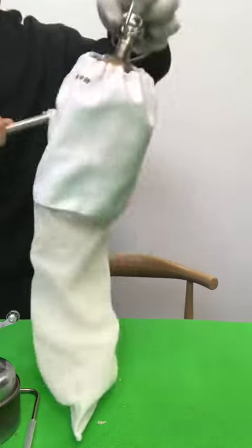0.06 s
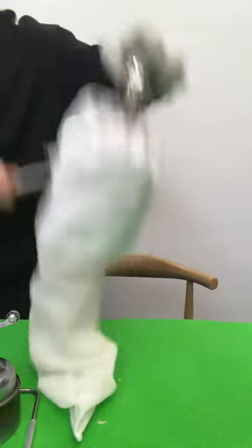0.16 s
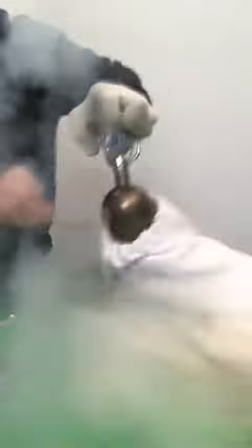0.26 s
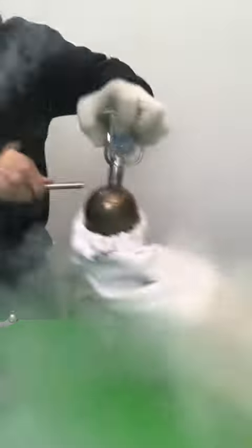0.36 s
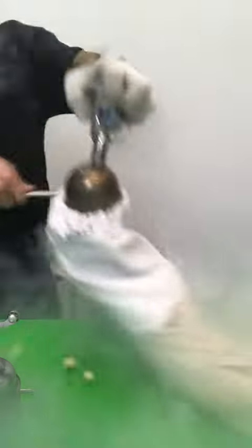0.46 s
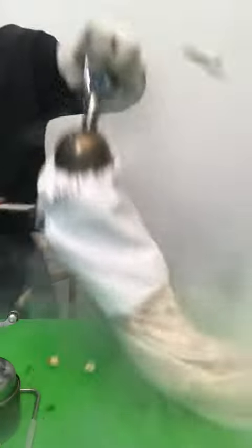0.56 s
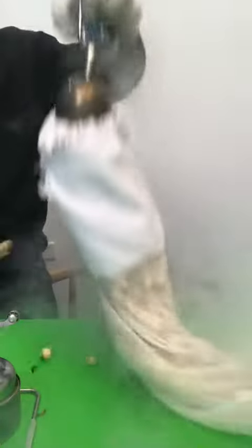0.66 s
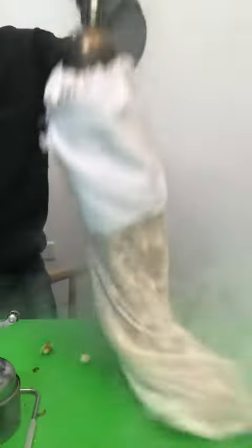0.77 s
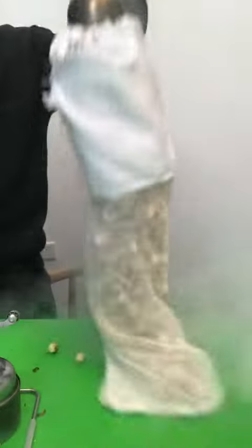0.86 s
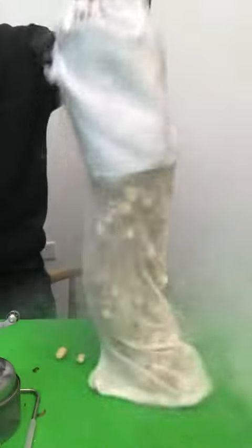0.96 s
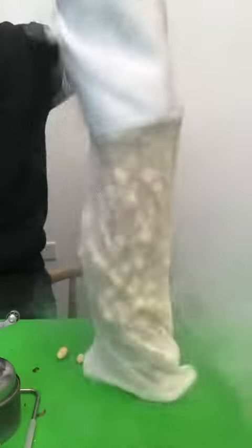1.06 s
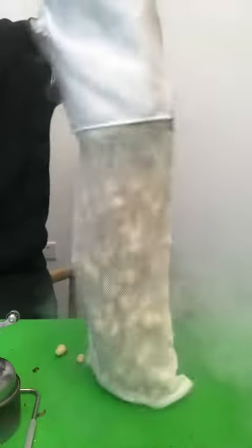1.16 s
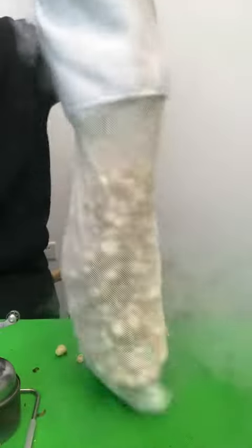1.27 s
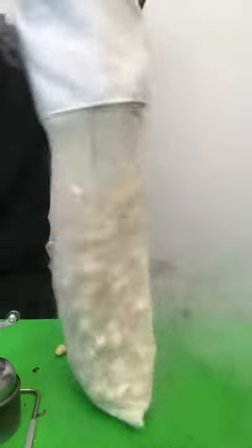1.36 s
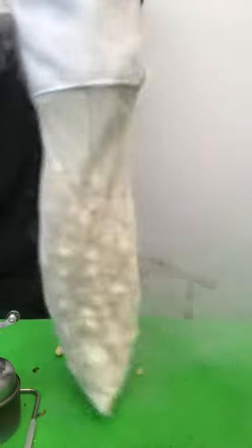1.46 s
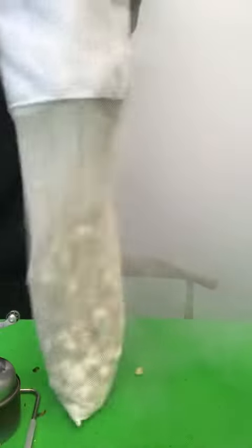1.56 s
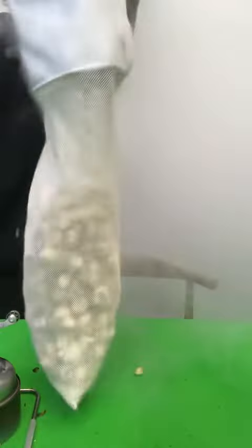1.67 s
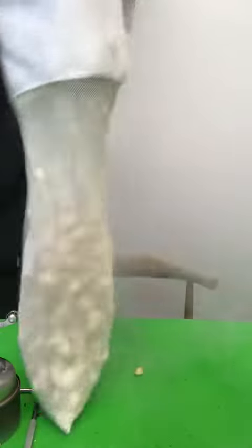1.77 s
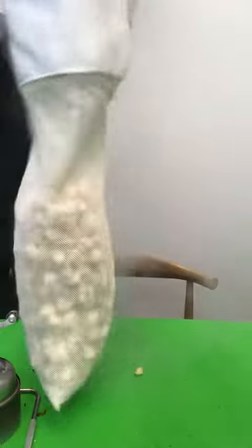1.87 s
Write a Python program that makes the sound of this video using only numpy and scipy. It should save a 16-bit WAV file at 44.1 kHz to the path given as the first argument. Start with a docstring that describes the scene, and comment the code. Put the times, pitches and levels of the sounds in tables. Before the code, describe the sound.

After a brief quiet hiss, a pressurised iron popper cracks open with a huge bang, steam roaring and grain pelting a cloth bag; the boom decays in a hard room, then light iron scrapes and clinks, close and overloaded.

```python
"""One first hears quiet room air over a hissing, rumbling pressurised pot; a shock crack then marks its opening.
An N-shaped pulse and shaped noise give the crack, roaring steam and grain pelting a cloth bag; decaying
modes, a faint steady hum and a diffuse tail give the boom. A limiter ducks under the bang and lets the
boom swell back. Afterwards dense slips give iron scrapes, and damped sines and resonators give clinks
of latch and lid as the pot is tipped out."""
import sys
import numpy as np
from scipy import signal
from scipy.io import wavfile
from scipy.ndimage import minimum_filter1d

SR = 44100
rng = np.random.default_rng(int(sys.argv[2]) if len(sys.argv) > 2 else 0)


def bounce(signal):
    """Save signal as a 16-bit WAV file at the path given by the first command-line argument."""
    frames = np.transpose(np.atleast_2d(signal))
    limited = np.clip(frames, -1, 1)
    pcm = np.round(limited * 32767).astype(np.int16)
    wavfile.write(sys.argv[1], SR, pcm)


N = 83790
T = np.arange(N) / SR  # time axis, s

# Every "density" is a noise spectrum per Hz, relative: the whole spectrum is later scaled to rms 1.
# Room air: f/Hz, density level/dB
AIR_SPECTRUM = [(25, 8.5), (50, -7), (80, 0.5), (140, -17), (250, -14.5), (500, -24.5), (1000, -22.5),
                (2000, -30), (5000, -39.5), (9000, -53), (15000, -68)]
# Closed pot hissing and rumbling under pressure: f/Hz, density level/dB
SIMMER_SPECTRUM = [(25, -22), (50, 0), (140, -13.5), (390, -26.5), (550, -34), (950, -26), (1600, -39.5),
                   (5000, -47), (9000, -55), (15000, -76)]
AIR_DB, SIMMER_DB = -50.5, -45

# Diffuse reflections of the small sounds
CLINK_WET_DB, SCRAPE_WET_DB, WET_T60_S = -14, -5, 0.83

# Iron sliding on iron: start t/s, length t/s, level/dB, treble level/dB relative to the slide
SCRAPE_STROKES = [(0.957, 0.11, -76.5, 5.5), (1.008, 0.1, -60.5, -4.5), (1.102, 0.096, -72, -2),
                  (1.196, 0.0088, -52, -19.5), (1.213, 0.044, -54, -4), (1.244, 0.053, -50.5, -2.5),
                  (1.31, 0.065, -54.5, -9.5), (1.384, 0.0056, -50, -7), (1.40, .02, -50.5, -6),
                  (1.4287, 0.0037, -44.5, 4), (1.446, .03, -48, -1), (1.479, 0.017, -49, 3.5),
                  (1.557, 0.046, -48, -0.5), (1.5956, .004, -43, -8), (1.608, 0.026, -44, -11),
                  (1.639, 0.0037, -43, -1), (1.659, 0.027, -48.5, -6), (1.713, 0.045, -52, -20),
                  (1.756, 0.0092, -44.5, -5), (1.776, 0.011, -47, -26), (1.7917, 0.0058, -42, 5.5),
                  (1.806, 0.026, -45.5, 3.5), (1.835, 0.018, -48, -3.5), (1.867, .035, -53, -7)]
# Body of the scrape: f/Hz, density level/dB
SCRAPE_BODY_SPECTRUM = [(150, 7), (400, -3), (1300, 3), (1900, -3.5), (2750, 3), (3400, -9.5), (5200, -4),
                        (6500, -7), (9000, -24.5)]
# Treble of the scrape, also of the latch ticks: f/Hz, density level/dB
TREBLE_SPECTRUM = [(2000, -10), (5000, 1), (7000, -12), (9400, 5.5), (11500, -22.5), (13500, -35.5),
                   (15500, -18.5)]
SCRAPE_RISE_SHARE = 0.072  # rise time as a share of slide length: longer slides start more gently
SCRAPE_T60_S, SLIPS_PER_S = 0.1, 3500
PATCHY_DB, PATCHES_PER_S = 1.5, 170  # the sliding iron grips unevenly

# Light touches that set the thin lever singing: t/s, level/dB
LEVER_PINGS = [(1.46, -52), (1.807, -45), (1.861, -39.5)]
PING_HZ, PING_T60_S = 7040, 0.38

# Latch clinks: t/s, level/dB, pitch f/Hz
LATCH_CLINKS = [(.742, -60, 4850), (1.042, -47.5, 4870), (1.090, -51, 4910), (1.203, -48.5, 4700),
                (1.245, -38.5, 5120), (1.267, -29.5, 4915), (1.276, -39, 4990), (1.303, -38.5, 4910),
                (1.386, -38.5, 4750), (1.396, -35, 4770), (1.426, -29, 4740), (1.433, -32.5, 4850),
                (1.450, -29.5, 4790), (1.459, -29.5, 4690), (1.466, -36, 4800), (1.481, -32.5, 4840),
                (1.559, -25.5, 4750), (1.573, -27.5, 4805), (1.599, -26, 4790), (1.606, -26, 4796),
                (1.614, -26.5, 4764), (1.625, -31.5, 4750), (1.642, -31, 4740), (1.6605, -31.5, 4880),
                (1.677, -36, 4850), (1.751, -29.5, 4800), (1.7565, -26.5, 4890), (1.795, -33, 4760),
                (1.810, -38, 4990), (1.817, -30, 4720), (1.824, -30.5, 4720), (1.837, -35, 4870),
                (1.851, -34, 4795)]
# Lid modes excited by every clink: f/Hz, level/dB relative to the clink, T60 t/s
LID_MODES = [(1347, -31, 0.083), (2690, -23.5, 0.19), (2745, -26, 0.12), (3940, -26, 0.1), (4748, -21, 0.2),
             (4840, -9.5, 0.11), (5090, -19, 0.055), (5610, -25, 0.084), (8400, -28, 0.084),
             (10100, -32, 0.066)]
CLINK_T60_S, CLINK_RISE_S = 0.037, 0.00063
TICK_DB, TICK_T60_S = -13.5, .014  # level relative to the clink

# Dry tick in the boom: f/Hz, density level/dB
KNOCK_SPECTRUM = [(300, -8), (1500, 4), (5000, -7), (9000, -13), (15000, -26)]
# Dull bump as the pot is tipped: f/Hz, density level/dB
BUMP_SPECTRUM = [(200, -16), (450, 0), (750, 15), (1100, -8), (2500, -35)]
KNOCK_S, KNOCK_DB, KNOCK_T60_S = .4458, -21, .005
KNOCK_TAIL_DB, KNOCK_TAIL_T60_S = -17.5, 0.12  # level relative to the tick
BUMP_S, BUMP_DB, BUMP_T60_S = 1.454, -36, 0.02

# Pot and room modes after the bang, with a faint steady hum at 133.5 Hz: f/Hz, level/dB, T60 t/s
BOOM_MODES = [(130.7, -11.5, 1.055), (133.5, -49.5, 25), (155.2, -16.5, .85), (198.3, 0.5, 0.39),
              (242.3, -15, 0.61), (274.2, -24, 1.087), (449, -8, 0.2), (558, -11, 0.33), (785, -30, 0.39),
              (832, -26, 0.67), (865, -23, 0.58), (1060, -11, 0.32), (1113, -14, .4)]
# Diffuse room tail: f/Hz, density level/dB
TAIL_SPECTRUM = [(35, -11.5), (70, -13), (140, -1.5), (180, -9), (277, -2.5), (395, -27.5), (480, -15),
                 (700, -30.5), (1000, -18.5), (1450, -30.5), (3000, -33), (5500, -41.5), (12000, -75.5)]
# Decay of the diffuse tail: f/Hz, T60 t/s
TAIL_DECAY = [(60, 1.2), (200, 1.04), (1000, 1.33), (4000, 1.104), (12000, 0.85)]
BOOM_RISE_S, TAIL_DB, TAIL_RISE_S = 0.013, -20, 0.045

# Grain pelting the cloth: f/Hz, density level/dB
SPRAY_SPECTRUM = [(500, -8.5), (1500, 7), (3000, -2.5), (6000, 6.5), (9000, -11), (15000, -26)]
SPRAY_DB, SPRAY_RISE_S, SPRAY_HOLD_S, SPRAY_T60_S = -19.5, .012, 0.032, 0.33

# Escaping steam: f/Hz, density level/dB
JET_SPECTRUM = [(30, -10), (85, -7), (200, -4.5), (330, -16), (480, -16.5), (700, -21.5), (1050, -11),
                (1300, -21), (1600, -23), (2500, -24.5), (6000, -30.5), (9500, -37.5), (15500, -64.5)]
# Decay of the steam: f/Hz, T60 t/s
JET_DECAY = [(50, 0.33), (200, 0.37), (1000, 0.26), (4000, 0.24), (14000, 0.24)]
JET_DB, JET_ATTACK_S, JET_HOLD_S = -2.5, 0.00035, 0.041
PUFF_HZ, PUFF_DB, PUFF_RISE_S = 53.8, -4, 0.0097  # the low shove of air that fills the bag

# Shock rebounds from the lid and the bag mouth: delay t/s, level/dB relative to the shock, length t/s
SHOCK_REBOUNDS = [(.0011, -1, .001), (.0026, -10, .0004)]
# Lid snapping off its seat: f/Hz, density level/dB
CRACK_SPECTRUM = [(600, -1), (1600, -6.5), (3000, -4.5), (5000, -20.5), (7300, -6), (10000, -21.5),
                  (15500, -20)]
BANG_S = .2263  # the pot opens
SHOCK_S, SHOCK_DB, SHOCK_TOP_HZ = 0.00067, 16, 7470
CRACK_DB, CRACK_T60_S = 0.5, .012

# Limiter threshold, deepest duck, hold and recovery; then peak ceiling (full scale 1) and top cut
LIMIT_DB, LIMIT_MAX_DB, LIMIT_HOLD_S, LIMIT_RELEASE_DB_PER_S = -8, 11.5, 0.13, 196
CEILING, CUTOFF_HZ = .95, 16000


def from_db(db):
    """Level as a logarithm: convert decibels to an amplitude ratio."""
    return 10 ** (np.asarray(db) / 20)


def rms_one(x):
    """Normalisation: scale a signal to unit rms."""
    return x / np.sqrt(np.mean(x ** 2) + 1e-20)


def at_hz(points, hz):
    """Interpolation of a table along a logarithmic frequency axis."""
    f, v = np.transpose(points)
    return np.interp(np.log(hz), np.log(f), v)


def envelope(start, rise, hold, t60):
    """Exponential approach and decay: the fall of 60 dB per t60 begins after the hold."""
    age = np.maximum(T - start, 0)
    attack = 1 - np.exp(-age / rise)
    release = from_db(-60 * np.maximum(age - hold, 0) / t60)
    return attack * release


def mode(start, hz, rise, t60):
    """Damped free vibration: a decaying sine at one natural frequency."""
    return envelope(start, rise, 0, t60) * np.sin(2 * np.pi * hz * (T - start))


def white():
    """Gaussian noise: equal mean power at every frequency."""
    return rng.standard_normal(N)


def slips(spread_db=3.0):
    """Impulsive excitation: dense, randomly timed clicks of either sign and uneven size."""
    hits = rng.random(N) < SLIPS_PER_S / SR
    signs = rng.choice([-1, 1], N)
    sizes = from_db(spread_db * np.minimum(rng.exponential(1, N), 4))
    return hits * signs * sizes


def drift(rate):
    """Random modulation: normal values of spread 1, joined by straight lines."""
    points = rng.standard_normal(N // 20)
    return np.interp(T * rate, np.arange(len(points)), points)


def coloured(spectrum, shape=lambda hz: 1, source=white):
    """Band synthesis: third-octave noise, jointly rms 1 before each band's own envelope."""
    edges = 22 * 2 ** (np.arange(30) / 3)
    # A wrapped lead-in lets the filters settle; neighbouring bands use separate draws.
    draws = [np.pad(source(), (SR // 4, 0), "wrap") for _ in range(2)]
    out, power = 0, 0
    for k, (low, high) in enumerate(zip(edges, edges[1:])):
        hz = np.sqrt(low * high)
        gain = from_db(at_hz(spectrum, hz)) * np.sqrt(high - low)
        band_filter = signal.butter(2, [low, high], "band", fs=SR, output="sos")
        band = signal.sosfilt(band_filter, draws[k % 2])[-N:]
        out = out + gain * rms_one(band) * shape(hz)
        power = power + gain ** 2
    return out / np.sqrt(power)


def low_pass(x, hz):
    """Second-order attenuation of the treble."""
    return signal.sosfilt(signal.butter(2, min(hz, SR / 2 - 1000), fs=SR, output="sos"), x)


def background():
    """Stationary noise: steady room air, with the closed pot's simmer ending at the bang."""
    air = from_db(AIR_DB) * coloured(AIR_SPECTRUM)
    simmer = from_db(SIMMER_DB) * coloured(SIMMER_SPECTRUM) * (T < BANG_S)
    return air + simmer


def room(x, wall_hz=6500):
    """Diffuse reverberation: convolution with decaying noise of unit energy, then slightly dulled."""
    response = white() * envelope(0.0099, 0.00244, 0, WET_T60_S)
    response = response / np.sqrt(np.sum(response ** 2))
    return low_pass(signal.fftconvolve(x, response)[:N], wall_hz)


def scrapes():
    """Stick-slip friction: dense slips form short slides, some brighter than others."""
    body, treble = np.zeros(N), np.zeros(N)
    for s, length, db, treble_db in SCRAPE_STROKES:
        stroke = from_db(db) * envelope(s, SCRAPE_RISE_SHARE * length, length, SCRAPE_T60_S)
        # Overlapping strokes add in power.
        body = np.hypot(body, stroke)
        treble = np.hypot(treble, stroke * from_db(treble_db))
    grip = from_db(PATCHY_DB * drift(PATCHES_PER_S))
    low_part = body * coloured(SCRAPE_BODY_SPECTRUM, source=slips)
    high_part = treble * coloured(TREBLE_SPECTRUM, source=slips)
    return grip * (low_part + high_part)


def lever():
    """Light damping: one high mode of the thin lever rings long after each touch."""
    return sum(from_db(db) * mode(s, PING_HZ, 0.0021, PING_T60_S) for s, db in LEVER_PINGS)


def latch():
    """Impact excitation: each clink is a bright tick, a damped note and a fainter ring of the lid."""
    out, ticks = np.zeros(N), np.zeros(N)
    for s, db, pitch in LATCH_CLINKS:
        out += from_db(db) * mode(s, pitch, CLINK_RISE_S, CLINK_T60_S)
        ticks += from_db(db + TICK_DB) * envelope(s, 0.00018, 0, TICK_T60_S)
    s, db, _ = np.transpose(LATCH_CLINKS)
    for hz, mode_db, t60 in LID_MODES:
        impulses = np.zeros(N)
        sizes = from_db(db + mode_db + rng.normal(0, 1.4, len(s)))
        impulses[(s * SR).astype(int)] = sizes * rng.choice([-1, 1], len(s))
        # A two-pole resonator: pole radius sets the decay, pole angle the pitch.
        radius = from_db(-60 / (t60 * SR))
        angle = 2 * np.pi * hz / SR
        poles = [1, -2 * radius * np.cos(angle), radius * radius]
        out += signal.lfilter([0, np.sin(angle)], poles, impulses + 1e-18)
    return out + ticks * coloured(TREBLE_SPECTRUM)


def knocks():
    """Short-duration noise: a dry tick with a faint tail, and a dull bump."""
    tick = envelope(KNOCK_S, 0.000073, 0, KNOCK_T60_S)
    tail = from_db(KNOCK_TAIL_DB) * envelope(KNOCK_S, 0.00036, 0, KNOCK_TAIL_T60_S)
    knock = from_db(KNOCK_DB) * coloured(KNOCK_SPECTRUM) * (tick + tail)
    bump = from_db(BUMP_DB) * coloured(BUMP_SPECTRUM) * envelope(BUMP_S, 0.00047, 0, BUMP_T60_S)
    return knock + bump


def boom():
    """Modal reverberation: modes of pot and room decay in a diffuse tail, beside a faint steady hum."""
    tones = sum(from_db(db) * mode(BANG_S, hz, BOOM_RISE_S, t60) for hz, db, t60 in BOOM_MODES)
    tail = coloured(TAIL_SPECTRUM, lambda hz: envelope(BANG_S, TAIL_RISE_S, 0, at_hz(TAIL_DECAY, hz)))
    return tones + from_db(TAIL_DB) * tail


def spray():
    """Many small impacts: puffed grain pelts the bag while the steam blows."""
    pelting = coloured(SPRAY_SPECTRUM, source=slips)
    return from_db(SPRAY_DB) * pelting * envelope(BANG_S, SPRAY_RISE_S, SPRAY_HOLD_S, SPRAY_T60_S)


def blast():
    """Jet noise: escaping steam roars and decays band by band, over one low shove of air."""
    jet = coloured(JET_SPECTRUM, lambda hz: envelope(BANG_S, JET_ATTACK_S, JET_HOLD_S, at_hz(JET_DECAY, hz)))
    age = np.maximum(T - BANG_S, 0)
    swell = age / PUFF_RISE_S * np.exp(1 - age / PUFF_RISE_S)  # peaks at 1 after PUFF_RISE_S
    puff = swell * np.sin(2 * np.pi * PUFF_HZ * age)
    return from_db(JET_DB) * jet + from_db(PUFF_DB) * puff


def n_wave(start, length):
    """Shock pulse: pressure jumps up, falls linearly through zero and jumps back."""
    part = (T - start) / length
    return (1 - 2 * part) * ((part >= 0) & (part < 1))


def shock():
    """Sudden pressure release: an N-shaped pulse, its near rebounds and a bright crack."""
    pulses = n_wave(BANG_S, SHOCK_S)
    for delay, db, length in SHOCK_REBOUNDS:
        pulses = pulses + from_db(db) * n_wave(BANG_S + delay, length)
    crack = coloured(CRACK_SPECTRUM) * envelope(BANG_S, .0001, 0, CRACK_T60_S)
    return from_db(SHOCK_DB) * low_pass(pulses, SHOCK_TOP_HZ) + from_db(CRACK_DB) * crack


def scene():
    """Superposition: the background, the bang and the handling of the pot add linearly."""
    clinks, slides = latch(), scrapes()
    reflections = room(from_db(CLINK_WET_DB) * clinks + from_db(SCRAPE_WET_DB) * slides)
    handling = knocks() + clinks + slides + lever() + reflections
    bang = shock() + blast() + spray() + boom()
    return (background() + handling + bang)[None]


def limiter(x):
    """Gain reduction: ducks at once under loud sound, holds, then recovers at a steady dB rate."""
    level_db = 20 * np.log10(np.abs(x).max(0) + 1e-9)
    over = np.clip(level_db - LIMIT_DB, 0, LIMIT_MAX_DB)
    half = int(LIMIT_HOLD_S * SR / 2)
    # The shifted window keeps the largest excess of the preceding hold time.
    held = -minimum_filter1d(-over, 2 * half + 1, origin=half, mode="nearest")
    recovery = LIMIT_RELEASE_DB_PER_S * T
    cut = np.maximum.accumulate(held + recovery) - recovery
    return x * from_db(-cut)


def record(dry):
    """Saturation and band limiting: limiter, rounded peaks, then a steep top cut."""
    rounded = CEILING * np.tanh(limiter(dry) / CEILING)
    top_cut = signal.cheby2(12, 70, CUTOFF_HZ + 1000, fs=SR, output="sos")
    return signal.sosfilt(top_cut, rounded)


dry = scene()
out = record(dry)
bounce(out)
```